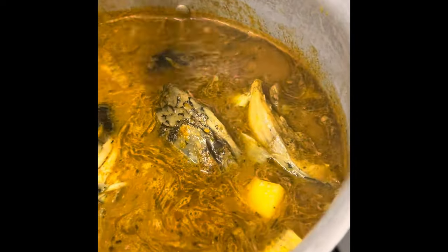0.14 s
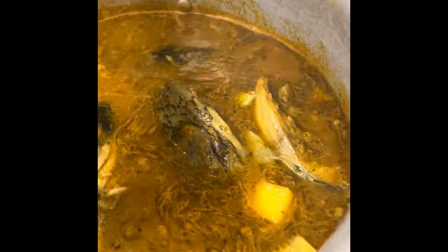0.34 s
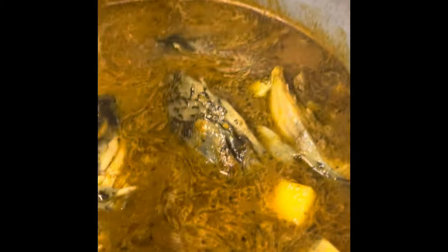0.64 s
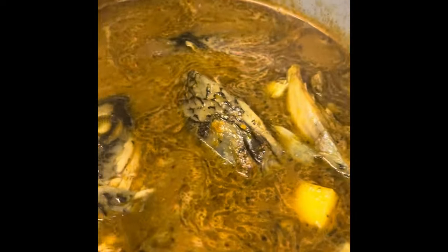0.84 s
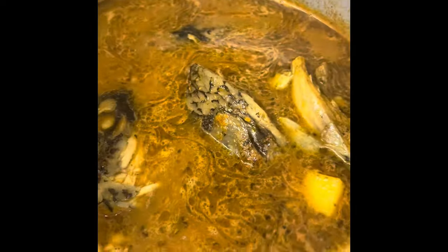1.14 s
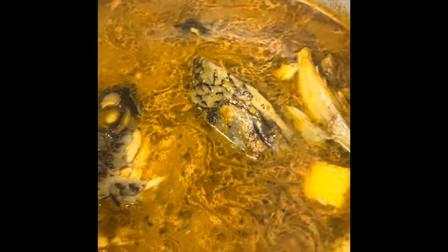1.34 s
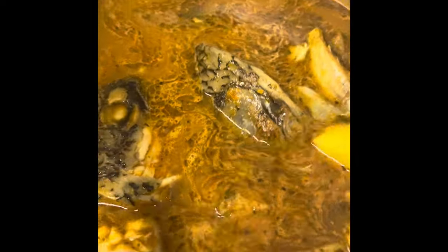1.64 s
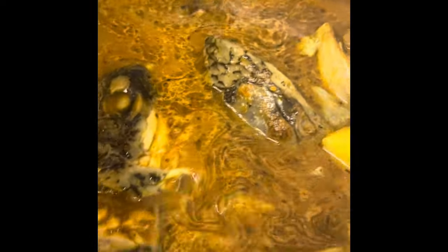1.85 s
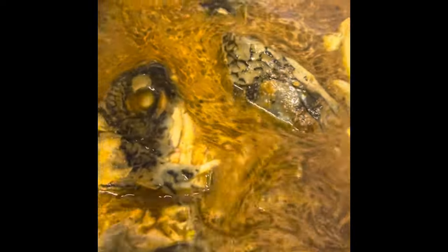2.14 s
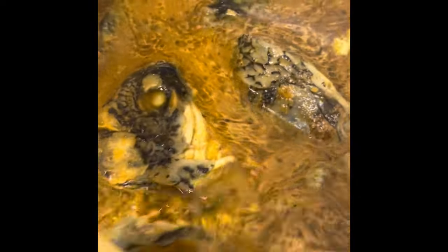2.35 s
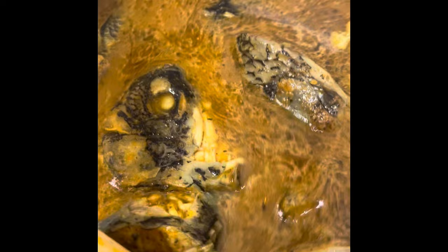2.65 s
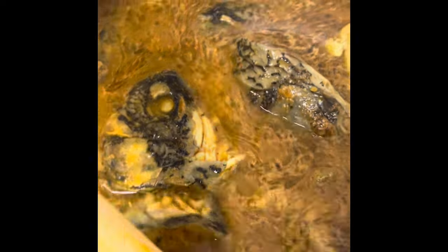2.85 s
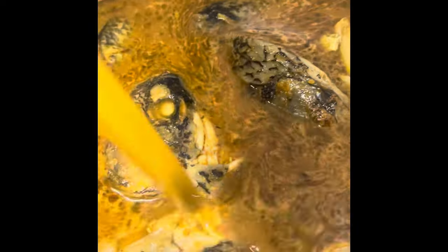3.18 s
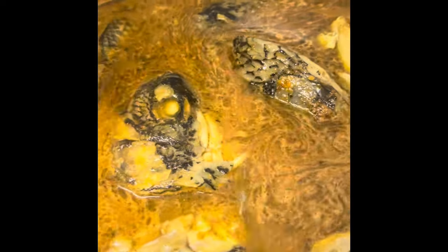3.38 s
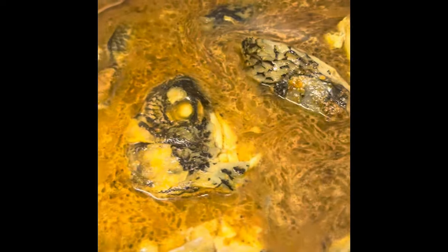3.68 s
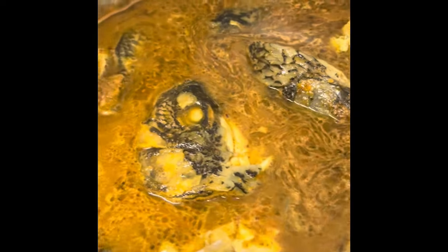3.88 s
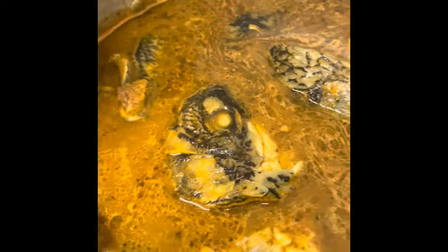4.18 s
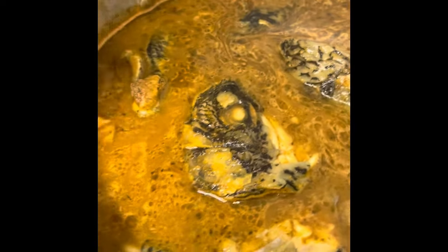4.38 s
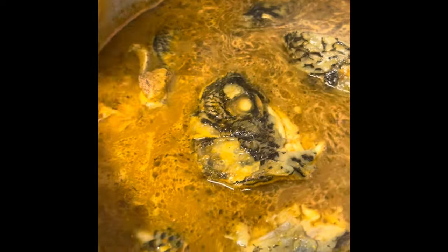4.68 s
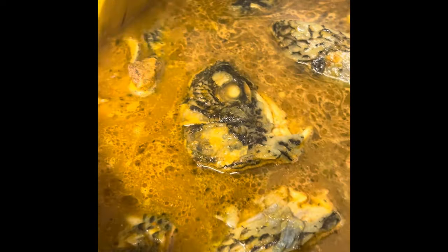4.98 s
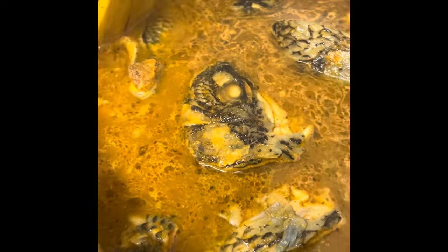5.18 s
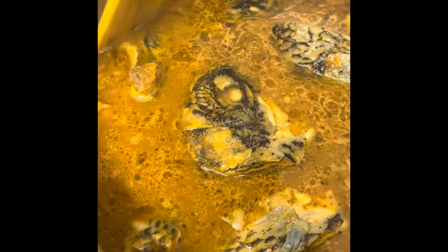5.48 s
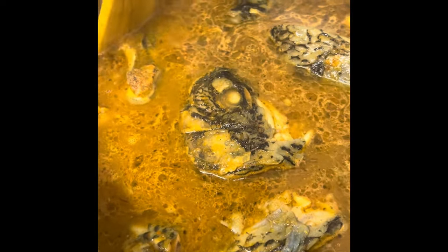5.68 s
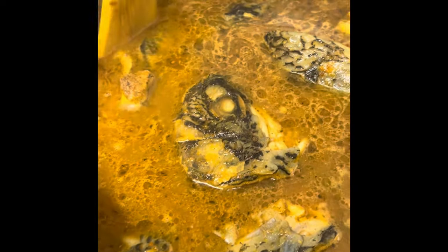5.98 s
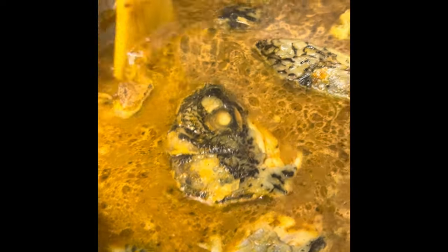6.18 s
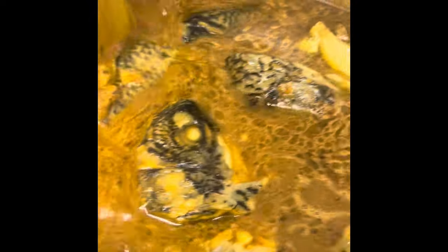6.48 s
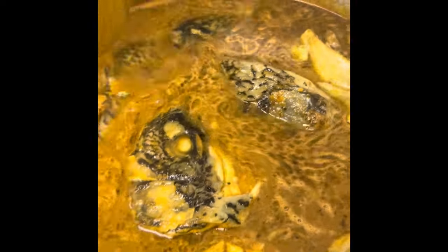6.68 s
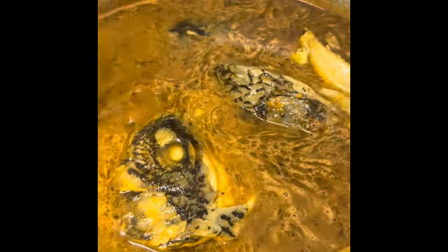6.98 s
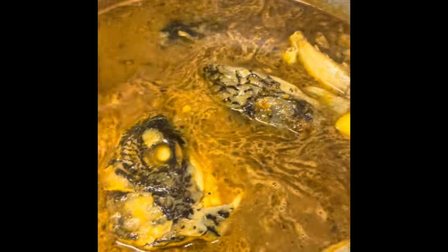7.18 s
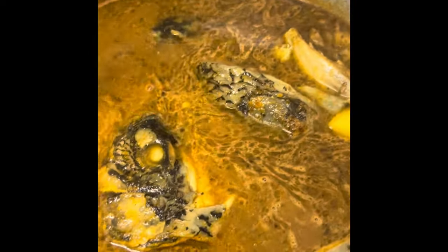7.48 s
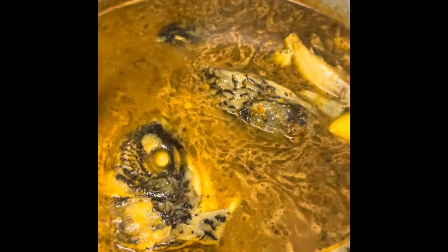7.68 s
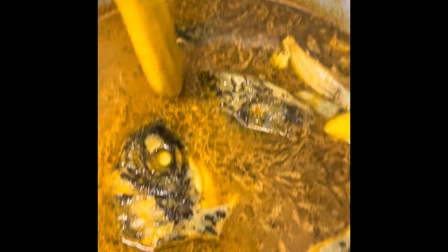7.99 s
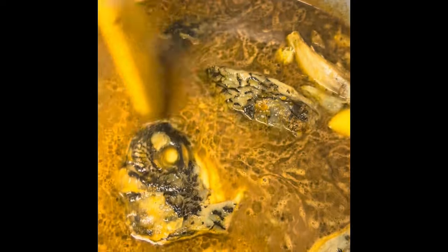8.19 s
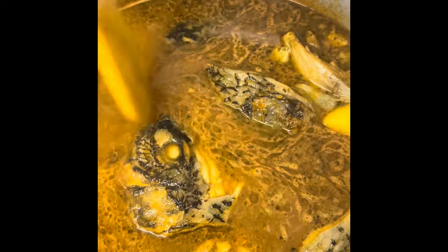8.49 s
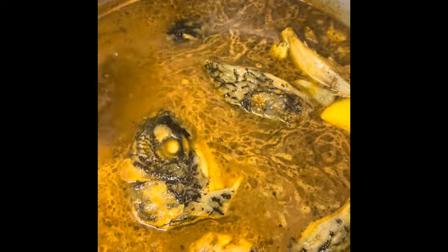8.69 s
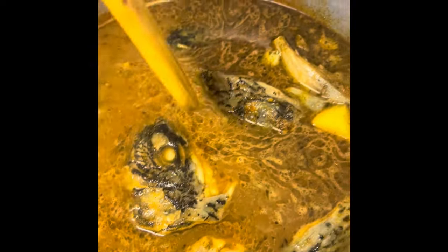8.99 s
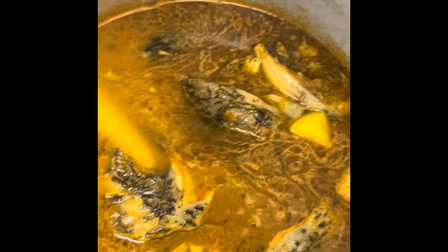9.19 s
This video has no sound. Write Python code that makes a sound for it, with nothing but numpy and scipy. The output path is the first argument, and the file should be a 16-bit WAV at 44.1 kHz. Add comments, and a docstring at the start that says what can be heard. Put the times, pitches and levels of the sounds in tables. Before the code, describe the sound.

A wooden spoon knocks and scrapes inside a big metal pot of thick, gently simmering soup, with dull bubble plops and a low stove rush.

```python
"""A wooden spoon stirs thick fish soup in a big aluminium pot, close by, in a small kitchen.
From the start the soup simmers with dull plops over the low rush of the stove; short bright bursts
of crackle with a rising ping make wet smacks, and ticks of the wet spoon as it knocks.
The spoon knocks on the wall, whose loaded bottom booms a moment later: ringing modes struck by a click.
Short strokes scrape the metal, noise and resonances shaped by pressure; past the middle comes a hard skid."""
import sys
import numpy as np
from scipy import signal
from scipy.fft import rfft, irfft, next_fast_len
from scipy.io import wavfile
from scipy.ndimage import uniform_filter1d, map_coordinates

SR = 44100
rng = np.random.default_rng(int(sys.argv[2]) if len(sys.argv) > 2 else 0)


def wav_out(sig):
    """Save sig, one row per channel (or a flat mono array), as 16-bit PCM at SR to the path in sys.argv[1]."""
    wavfile.write(sys.argv[1], SR, np.round(np.clip(np.atleast_2d(sig).T, -1, 1) * 32767).astype(np.int16))


N = 411894

# Colour of thick broth. Each row: frequency in Hz, relative level in dB per Hz.
BROTH = [(90, -13.5), (160, 6), (240, -2), (310, 6.5), (430, -2.5), (560, 0), (700, 1), (850, -1.5),
         (1000, -20.5), (1300, -15.5), (2200, -63.5)]
# Spoon strokes. Each row: moment of firmest pressure in s, rise in s, fall in s, then rasp, hiss, drag
# and wall ring in dB before the layers' own trims, and the centre of the ring in Hz.
STROKES = [(0.721, 0.0045, .004, -63, -74.5, -38, -86, 2300),
           (0.958, 0.17, 0.081, -63, -80, -58.5, -65, 3600),
           (1.37, 0.37, 0.044, -65, -86, -56.5, -74.5, 2430),
           (1.445, 0.072, 0.092, -56.5, -61, -51, -58, 2740),
           (1.76, 0.072, 0.053, -60.5, -61, -55, -67.5, 2580),
           (2.021, 0.15, 0.038, -60, -73.5, -53.5, -63.5, 2260),
           (2.17, 0.042, 0.062, -58.5, -59.5, -54, -68, 2500),
           (2.323, 0.018, 0.024, -60, -62, -48.5, -58.5, 2460),
           (2.383, 0.02, 0.07, -53, -56, -46, -55, 2370), (2.59, 0.052, 0.067, -52, -60.5, -53, -68, 6500),
           (2.806, 0.02, 0.037, -56, -58.5, -45.5, -64.5, 2600),
           (2.915, 0.011, 0.013, -62.5, -84, -72, -78, 2400),
           (2.991, 0.028, 0.031, -65.5, -61.5, -67.5, -82, 5060),
           (3.712, 0.012, 0.053, -72, -71.5, -54.5, -73.5, 4250),
           (3.81, 0.11, 0.1, -68, -79, -63.5, -72.5, 4200),
           (4.015, 0.032, 0.059, -67.5, -71, -76, -81, 4900),
           (4.17, 0.041, 0.059, -70, -77, -57, -70.5, 4200),
           (4.365, 0.096, 0.078, -65, -63.5, -63.5, -61.5, 4300),
           (4.603, 0.03, 0.03, -66, -73.5, -64, -71, 2760),
           (4.657, 0.019, 0.022, -63.5, -66, -69, -67, 5140),
           (4.682, 0.0063, 0.059, -58.5, -49, -67, -60, 3800),
           (4.802, 0.068, 0.072, -57.5, -58.5, -51.5, -73, 2500),
           (4.99, 0.064, 0.075, -65, -73, -63, -74.5, 4560),
           (5.55, 0.08, 0.11, -61.5, -72, -58.5, -83.5, 2680),
           (5.95, 0.068, 0.086, -70.5, -82.5, -64.5, -89, 2660),
           (6.11, 0.022, 0.094, -68, -73.5, -80, -90, 2470),
           (6.29, 0.084, 0.1, -76, -95.5, -64.5, -96, 2240),
           (8.058, 0.14, 0.13, -74.5, -101, -73, -84, 2304)]
# Wall resonances fed by rubbing. Each row: frequency in Hz, width in Hz, relative level in dB.
SINGING = [(1510, 80, -8.5), (2400, 220, -3), (3102, 250, -8), (3470, 240, -7.5), (4000, 160, -14.5),
           (4600, 210, -13.5), (5070, 73, -14.5), (5770, 300, -2), (6500, 140, -7.5), (6870, 170, -8),
           (7860, 120, -11), (8370, 160, -10.5), (9060, 190, -7)]


def amp(db):
    """Decibels to gain."""
    return np.exp(np.asarray(db) * (np.log(10) / 20))


def unit(x):
    """Scale to rms 1."""
    return x / np.sqrt(np.mean(x ** 2) + 1e-20)


def along(points, hz):
    """Read a curve of (Hz, value) points on a log frequency axis."""
    f, v = np.transpose(points)
    return np.interp(np.log(hz + 1), np.log(f + 1), v)


def wobble(rate):
    """A smooth random curve, rate knots a second."""
    count = int(N * rate / SR) + 4
    fine = signal.resample(rng.standard_normal(count), count * 20)
    return np.interp(np.arange(N) * rate / SR * 20, np.arange(len(fine)), fine)


def wander(shape, smooth_s=0.0031):
    """A smooth random walk of phase in cycles, spreading by about 1 in a second."""
    size = max(int(smooth_s * SR), 1)
    steps = uniform_filter1d(uniform_filter1d(rng.standard_normal(shape), size), size)
    return np.cumsum(steps, axis=-1) / np.sqrt(SR)


def filtered(x, response):
    """Multiply the spectrum of x by a response of frequency."""
    n = x.shape[-1]
    padded = next_fast_len(n + SR // 5)
    return irfft(rfft(x, padded) * response(np.fft.rfftfreq(padded, 1 / SR)), padded)[..., :n]


def spread(pair, spectrum):
    """Colour two unrelated signals and blend them into left and right, rms 1."""
    # Each row: frequency in Hz, left-right likeness from 0 to 1.
    likeness = [(60, 1), (150, 0.87), (350, 0.98), (700, 0.64), (1400, 0.87), (3100, 0.99), (7000, 0.52),
                (15000, 0.13)]

    def mid_and_side(hz):
        turn = np.arccos(np.clip(along(likeness, hz), -1, 1)) / 2
        return amp(along(spectrum, hz)) * [np.cos(turn), np.sin(turn)]

    mid, side = filtered(pair, mid_and_side)
    return unit(np.array([mid + side, mid - side]))


def pulse(spectrum, size=2048):
    """The sharpest causal click with this spectrum (minimum phase), energy 1."""
    gain = amp(along(spectrum, np.fft.rfftfreq(size, 1 / SR)))
    cepstrum = irfft(np.log(gain + 1e-6))
    click = irfft(np.exp(rfft(2 * cepstrum * (np.arange(size) < size // 2))))
    return click / np.linalg.norm(click)


def grains(rate, scatter_db, smooth):
    """Random tiny impacts, rate a second, on a bed of noise, as two unrelated rows."""
    struck = rng.random((2, N)) < rate / SR
    hits = struck * rng.standard_normal((2, N)) * amp(scatter_db * rng.uniform(-1, 1, (2, N)))
    return unit(hits) + smooth * rng.standard_normal((2, N))


def shifting(x, depth_db, width_hz, life):
    """Resonances that come and go: random gain patches width_hz wide and life seconds long, rms 1."""
    hz, t, z = signal.stft(x, SR, nperseg=512)
    u, v = np.meshgrid(hz / width_hz, t / life, indexing="ij")
    knots = rng.standard_normal((int(u.max()) + 3, int(v.max()) + 3))
    patches = amp(depth_db * map_coordinates(knots, [u, v], order=2))
    return unit(signal.istft(z * patches, nperseg=512)[1][:, :x.shape[-1]])


def even(x, width_hz):
    """Flatten the broad humps of a rattle's spectrum, keeping its energy and phases."""
    z = rfft(x)
    power = np.mean(abs(z) ** 2, axis=0)
    width = max(int(width_hz * x.shape[-1] / SR), 1)
    hump = np.sqrt(abs(uniform_filter1d(power, width)) + 1e-20)
    return unit(irfft(z / hump, x.shape[-1])) * np.sqrt(np.mean(x ** 2))


def resonance(f, hz, width_hz):
    """Gain of one resonance at the frequencies f."""
    return 1 / (1 + ((f - hz) / (width_hz / 2)) ** 2)


def rubbed(hz, width_hz, size=N, catch_db=2.5, catches_per_s=28):
    """One resonance kept going by friction that catches and lets go, rms 1."""
    catch = amp(catch_db * wobble(catches_per_s)[:size])
    return unit(catch * filtered(rng.standard_normal(size), lambda f: resonance(f, hz, width_hz)))


def add(track, s, sound):
    """Mix a sound in at s seconds."""
    part = track[..., round(s * SR):][..., :sound.shape[-1]]
    part += sound[..., :part.shape[-1]]


def kitchen(x, wet_db):
    """A sound with its own stereo tail from the pot's hollow and the walls."""
    # Each row: frequency in Hz, t60 in seconds.
    tail_decay = [(150, 0.92), (500, 0.24), (1500, 0.29), (4000, 0.28), (10000, 0.21)]
    hz, t, z = signal.stft(rng.standard_normal((2, SR // 2)), SR, nperseg=256)
    fade = amp(-60 * t / along(tail_decay, hz)[:, None])
    tail = signal.istft(z * fade, SR, nperseg=256)[1]
    tail = spread(tail, [(100, 0), (10000, 0)]) / np.sqrt(tail.shape[1])
    return x + amp(wet_db) * signal.fftconvolve(np.atleast_2d(x), tail, axes=1)[:, :x.shape[-1]]


def simmer(broth_db=-1.7, bubble_db=-3, fizz_db=2.0, stove_db=-65):
    """Small bubbles on the broth's murmur, the fizz of oil, the stove's low rush and a faint hum."""
    # Each row: time in s, bubbling in dB, fizz in dB, both before the trims above.
    simmer_levels = [(0.0, -63, -76.5), (0.521, -61, -75), (0.78, -66.5, -74), (1.56, -62.5, -78),
                     (2.39, -61, -78.5), (3.22, -70, -79), (3.61, -64, -80.5), (6.3, -65, -79),
                     (6.66, -66.5, -80.5), (8.011, -62, -79), (8.71, -65, -79.5), (9.34, -64, -79.5)]
    # Colour of the spitting oil. Each row: frequency in Hz, relative level in dB per Hz.
    oil_colour = [(600, -28), (1000, 2.5), (1350, -11), (1600, -3.5), (1880, -4.5), (2120, -9.5),
                  (2370, -8.5), (2700, -10), (3050, -10.5), (3500, -13), (4100, -17), (5200, -18),
                  (8000, -18), (11300, -23.5), (14000, -43), (16000, -51.5)]
    # Colour of the stove's rush. Each row: frequency in Hz, relative level in dB per Hz.
    stove_colour = [(20, -10), (36, -8.5), (55, 0), (90, 2.5), (200, -3), (350, -21.5), (500, -9),
                    (800, -45)]
    # Mains hum in the kitchen. Each row: frequency in Hz, level in dB.
    hum_tones = [(50, -70), (100, -70)]
    t = np.arange(N) / SR
    s, *levels = np.transpose(simmer_levels)
    bubbling, fizz = (amp(np.interp(t, s, db)) for db in levels)

    broth = amp(broth_db + 3.3 * wobble(25)) * spread(rng.standard_normal((2, N)), BROTH)

    spits = grains(rate=700, scatter_db=12.5, smooth=2.565)
    spits = shifting(spits, depth_db=2.2, width_hz=300, life=.07)
    oil = amp(fizz_db + 0.72 * wobble(8.4)) * fizz * spread(spits, oil_colour)

    drift = 0.36 * wobble(7.1)  # radians
    hum = sum(amp(db) * np.sqrt(2) * np.sin(2 * np.pi * hz * t + drift) for hz, db in hum_tones)

    stove = unit(filtered(rng.standard_normal(N), lambda hz: amp(along(stove_colour, hz))))
    return bubbling * (broth + amp(bubble_db) * bubbles()) + oil + hum + amp(stove_db) * stove


def bubbles(pitch_hz=660, octaves=0.31, cycles=2.67, scatter_db=1.2, muffle_hz=950, count=650):
    """Small bubbles at random moments, each a few fading cycles muffled by the thick soup, rms 1."""
    t = np.arange(SR // 50) / SR
    when = rng.integers(0, N, (count, 1))
    pitch, size = rng.standard_normal((count, 2)).T[:, :, None]
    turns = pitch_hz * 2 ** (octaves * pitch) * t
    fade = amp(scatter_db * size - 20 * turns / cycles)  # 20 dB down after so many cycles
    blips = fade * np.sin(2 * np.pi * turns) * (1 - np.exp(-2 * turns))
    train = np.bincount((when + np.arange(len(t))).ravel(), blips.ravel(), N)[:N]
    muffle = signal.butter(6, muffle_hz, fs=SR, output="sos")
    return unit(signal.sosfilt(muffle, train))


def plops(plop_db=1, cycles=4, glide=0.034, pop=0.31, skin=0.2):
    """Bubbles burst in thick soup: a dull pop, a few rising cycles and a splutter."""
    # Each row: start in s, level in dB before the trim plop_db, starting pitch in Hz.
    big_bubbles = [(0.162, -54, 610), (0.338, -42, 655), (0.856, -44, 503), (1.086, -37, 450),
                   (1.376, -40, 414), (1.627, -42.5, 560), (1.838, -45, 483), (2.791, -42, 594),
                   (3.363, -48.5, 720), (3.623, -41, 650), (3.796, -43, 770), (3.894, -45.5, 605),
                   (3.947, -47, 606), (4.072, -45.5, 670), (4.237, -43, 640), (4.605, -43, 604),
                   (5.053, -45, 660), (5.087, -46, 720), (5.134, -46, 626), (5.31, -44, 657),
                   (5.381, -40, 683), (5.531, -41.5, 643), (5.597, -43, 655), (5.842, -43.5, 610),
                   (5.935, -44, 610), (6.296, -45.5, 542), (6.374, -48.5, 562), (6.431, -48, 444),
                   (6.691, -44.5, 548), (6.998, -48.5, 675), (7.333, -47, 660), (7.57, -45.5, 617),
                   (7.627, -44, 655), (7.776, -51, 677), (8.032, -48, 660), (8.054, -41.5, 644),
                   (8.139, -38.5, 665), (8.78, -54, 654), (8.986, -50.5, 540), (9.057, -46, 647)]
    out, t = np.zeros(N), np.arange(SR // 10) / SR
    dull = pulse(BROTH)
    for s, db, hz in big_bubbles:
        age = t * hz / cycles  # the tone is 20 dB down at age 1
        rising_hz = hz * (1 + glide * np.minimum(2 * age, 1))
        tone = np.sin(2 * np.pi * np.cumsum(rising_hz) / SR) * amp(-20 * age)
        splutter = skin * rng.standard_normal(len(t)) * amp(-60 * t / 0.049)
        tear = splutter + pop * (t == 0) / dull.max()
        burst = signal.fftconvolve(tear, dull)[:len(t)]
        add(out, s, amp(db + plop_db) * (tone * (1 - np.exp(-t / 0.00088)) + burst))
    return out


def smacks_and_ticks(octaves=0.8, ping=0.23, glide=.07):
    """Short bright crackling bursts, each with a rising ping: wet smacks, and ticks of the wet spoon as it knocks."""
    # Each row: start in s, level in dB, centre in Hz, length in s.
    wet_bursts = [(0.294, -63.5, 1970, .023), (0.474, -65.5, 9900, 0.0034), (0.546, -54.5, 10000, 0.0036),
                  (0.576, -70, 8930, 0.00354), (2.209, -56.5, 1840, 0.0082), (2.651, -63, 5930, .004),
                  (2.952, -60, 7460, 0.03), (3.035, -71, 3470, .008), (3.071, -64.5, 9240, 0.0023),
                  (3.699, -59, 3470, 0.0037), (4.138, -64, 5400, 0.0018), (5.544, -69.5, 6350, 0.0063),
                  (5.595, -70.5, 6300, 0.0084), (6.629, -75.5, 2110, 0.024), (6.995, -63, 6340, 0.0026),
                  (6.996, -68, 1880, .003), (7.021, -73, 2300, 0.025), (7.28, -74.5, 2600, 0.0074),
                  (7.39, -79.5, 3200, .02), (7.932, -76.5, 2600, 0.023), (8.362, -71.5, 1900, .022),
                  (8.661, -74, 2200, 0.013), (7.114, -65, 1615, 0.025), (7.13, -68.5, 2550, 0.0122),
                  (7.122, -68.5, 6300, 0.018), (7.132, -72, 9200, .01), (7.142, -66, 2000, .003),
                  (7.648, -71.5, 3420, 0.0094), (8.174, -66.5, 2190, 0.04), (8.178, -68.5, 5100, 0.025),
                  (8.194, -58, 5950, 0.0033), (8.346, -60, 2050, 0.0025), (8.347, -68, 3400, .0018),
                  (8.591, -70.5, 1900, 0.0083), (8.696, -62, 3870, 0.0018), (8.713, -62.5, 3350, 0.0024)]
    out, t = np.zeros(N), np.arange(SR // 5) / SR
    for s, db, centre_hz, length in wet_bursts:
        band = lambda hz: (1 + (np.log2((hz + 1) / centre_hz) / octaves) ** 2) ** -2
        crackle = rng.laplace(size=(1, len(t)))
        crackle = shifting(crackle, depth_db=3, width_hz=220, life=.1)[0]
        burst = unit(filtered(crackle, band))
        rising_hz = centre_hz * (1 + glide * np.minimum(t / length - .5, 2))
        rising_ping = np.sin(2 * np.pi * np.cumsum(rising_hz) / SR)
        swell = (2 * t / length) * np.exp(1 - 2 * t / length)  # peaks at half the length
        add(out, s, amp(db) * (burst + ping * rising_ping) * swell)
    return out


def knocks(click_db=5, clatter_db=-8.5, tick_db=-23, graze_db=-32, graze_rise=0.0029, wash_t60=0.27,
           wall_waver=1.1):
    """Each blow: a brief graze, a crack, the spoon's short tone, the wall's clatter, modes and wash, and the boom."""
    # Spoon blows. Each row: start in s, knock in dB, contact cut-off in Hz, clatter t60 in s,
    # wall ring in dB re knock, wash in dB re knock, spoon tone in Hz, spoon tone in dB re knock,
    # spoon tone t60 in s, boom in dB, boom centre in Hz, boom delay in s.
    blows = [(0.547, -9.5, 3480, 0.02, -20, -37, 1310, -9, 0.018, -23.5, 110, 0.026),
             (0.7226, -18.5, 2660, 0.033, -19.5, -28, 1162, -7.5, 0.048, -30.5, 124, 0.025),
             (2.3055, -33, 710, .025, -15.5, -38, 297, 1, 0.05, -36.5, 215, 0.00703),
             (2.376, -42.5, 4000, .025, -24, -14, 603, 2.5, 0.035, -64, 180, 0.0108),
             (3.4854, -11, 12500, 0.02, -25, -25, 830, -13.5, 0.027, -28.5, 237, 0.021),
             (3.699, -62, 6100, 0.023, -10, -26, 810, 8, .03, -44, 143, .026),
             (4.137, -45.5, 970, 0.021, -11, -27, 710, 1.5, 0.032, -57, 168, 0.026),
             (4.854, -50.5, 605, .025, -4, -20, 390, -10, .08, -47, 161, 0.023)]
    # Pot wall modes. Each row: frequency in Hz, mean relative level in dB, t60 in s.
    wall_modes = [(323.8, -2, 0.18), (386, 6, 0.17), (523, -4, 0.14), (586, -9.5, .13), (800, -0.5, .14),
                  (948, 0.5, 0.083), (1023, -10, 0.083), (1190, -10.5, 0.13), (1310, -11, 0.079),
                  (1480, -13, 0.11), (2120, -19, 0.14), (2240, -10.5, 0.13), (2720, -14.5, 0.077),
                  (3220, -24.5, .15), (3572, -23, 0.12), (3747, -22, 0.2), (4172, -28, .19)]
    # Colour of wood on metal. Each row: frequency in Hz, relative level in dB per Hz.
    crack_colour = [(100, -15), (250, -5), (450, -9.5), (700, 0), (1000, -2), (1400, -4), (1800, -12.5),
                    (2280, -6), (2650, -17), (3200, -12.5), (3750, -13), (5000, -18.5), (7800, -17.5),
                    (11500, -37.5), (15000, -51.5)]
    # The wall's many weak, overlapping modes. Each row: frequency in Hz, relative level in dB per Hz.
    wash_colour = [(250, -9), (450, -0.5), (700, 7), (1100, -0.5), (1400, -1), (1800, -18), (2250, -13.5),
                   (2700, -23.5), (3700, -9.5), (4800, -20.5), (9000, -33.5)]
    out, lead = np.zeros((2, N)), SR // 50  # lead: samples kept for the graze before contact
    t = np.arange(-lead, SR // 2) / SR
    age, click = np.maximum(t, 0), pulse(crack_colour)
    onset = 1 - np.exp(-age / 0.00025)
    hz, level, t60 = np.transpose(wall_modes)[:, :, None]
    signs = (-1) ** np.arange(len(wall_modes))[:, None]
    for (s, db, contact_hz, clatter_t60, ring_db, wash_db, wood_hz, wood_db, wood_t60,
         boom_db, centre_hz, delay) in blows:
        clatter = spread(rng.standard_normal((2, len(t))), [(100, 0), (10000, 0)])
        graze = amp(graze_db) * np.exp(-abs(t) / graze_rise)
        shape = np.where(t < 0, graze, amp(clatter_db - 60 * age / clatter_t60))
        contact = even(shape * clatter + amp(click_db) * (t == 0), width_hz=520)
        crack = signal.fftconvolve(contact, click[None], axes=1)[:, :len(t)]

        # moving soup loads the wall, so each mode's phase wanders
        drift = wander((len(wall_modes), len(t) - lead))
        drift = wall_waver * np.pad(drift, [(0, 0), (lead, 0)])
        strength = level + rng.normal(0, 1.2, level.shape)
        modes = amp(strength - 60 * age / t60) * np.sin(2 * np.pi * (hz * age + drift))
        ring = amp(ring_db) * np.sum(modes * signs, axis=0)

        weak_modes = shifting(rng.standard_normal((2, len(t))), depth_db=4, width_hz=130, life=.06)
        wash = amp(wash_db - 60 * age / wash_t60) * spread(weak_modes, wash_colour)
        wood = amp(wood_db - 60 * age / wood_t60) * np.sin(2 * np.pi * wood_hz * age)

        # a soft, wet contact keeps only a faint tick of its treble
        soft = signal.butter(6, min(contact_hz, SR / 2.2), fs=SR, output="sos")
        blow = signal.sosfilt(soft, crack + (ring + wash + wood) * onset) + amp(tick_db) * crack
        low = amp(boom_db) * onset * boom(t - delay, centre_hz)
        add(out, s - lead / SR, amp(db) * kitchen(blow, wet_db=-13.5) + low)
    return out


def boom(t, centre_hz, rise=0.005, hold=0.0083, octaves=0.52, waver=.8):
    """The bottom swells around t = 0 and holds briefly; the place of contact picks its modes, which waver as the soup sways."""
    # Modes of the bottom under the soup. Each row: frequency in Hz, relative level in dB, t60 in s.
    bottom_modes = [(74.6, -9.5, 0.63), (116.6, -10.5, 0.39), (125.9, -10, 1.0), (130.7, -3.5, 0.11),
                    (143, -17.5, 1.1), (152.5, -2.5, 0.38), (177.5, -9, 0.25), (207.4, -11, 0.4)]
    swell = np.exp(-(np.minimum(t + hold, 0) / rise) ** 2)
    total = 0
    for hz, db, t60 in bottom_modes:
        fade = amp(db - 60 * np.maximum(t - hold, 0) / t60)
        picked = np.exp(-(np.log2(hz / centre_hz) / octaves) ** 2 / 2)
        sway = waver * np.interp(t, t[t > 0], wander(np.sum(t > 0)))
        total = total + fade * picked * np.cos(2 * np.pi * (hz * t + sway))
    return swell * total


def scrapes(rasp_db=-3.0, hiss_db=-4.0, drag_db=-2.0, judder_db=1.56, squelch_db=-14, clump_db=3,
            between_modes=1.0):
    """Wet wood rubs on the metal: dense tiny slips ring the wall's upper modes and shake the pot."""
    # Four colours of rubbing. Each row: frequency in Hz, relative level in dB per Hz.
    rasp_colour = [(400, -24), (650, 14), (850, 7.5), (1080, 8.5), (1300, 2.5), (1520, 2), (1900, 0),
                   (2400, -3.5), (2800, -4), (3300, -9.5), (4400, -11.5), (6000, -36.5), (9000, -34)]
    hiss_colour = [(2600, -10), (4500, 1.5), (5800, 3), (8000, 2.5), (10000, -5), (11400, -3.5),
                   (12500, -31), (16000, -26)]
    drag_colour = [(30, -28), (55, 2), (90, 0.5), (182, -2.5), (215, -5), (259, -1.5), (386, -5.5),
                   (563, -5.5), (631, -4), (892, -29.5), (1030, -13.5), (1100, -14), (1430, -37.5),
                   (2420, -120)]
    squelch_colour = [(500, -22.5), (1000, 3), (1700, 2), (3500, -3), (6000, -21), (12000, -53)]
    # Low resonances shaken by the dragging spoon. Each row: frequency in Hz, width in Hz,
    # level in dB re drag.
    shaken_modes = [(150, 24, -7), (183.5, 70, -3), (391, 30, -10.5)]
    pressures = np.array([stroke(s, rise, fall) for s, rise, fall, *_ in STROKES])
    rasp, hiss, drag = amp(np.transpose(STROKES)[3:6]) @ pressures

    # the sliding contact keeps passing from one set of wall modes to another
    slips = grains(rate=3000, scatter_db=5, smooth=.8)
    slips = shifting(slips, depth_db=4.2, width_hz=130, life=.07)
    modal = lambda f: between_modes + sum(resonance(f, hz, width_hz) for hz, width_hz, _ in SINGING)
    slips = filtered(slips, modal)
    judder = amp(judder_db * wobble(60))
    bright = amp(rasp_db) * rasp * spread(slips, rasp_colour)
    bright += amp(hiss_db) * hiss * spread(slips, hiss_colour)

    shudder = sum(amp(db) * rubbed(hz, width_hz) for hz, width_hz, db in shaken_modes)
    rumble = amp(drag_db) * spread(rng.standard_normal((2, N)), drag_colour)
    low = drag * (rumble + shudder)

    # sauce caught under the spoon squelches in tiny clumped pops
    pops = grains(rate=600, scatter_db=4, smooth=.25)
    squelch = amp(squelch_db + clump_db * wobble(35)) * rasp * spread(pops, squelch_colour)
    return judder * bright + squelch + low + kitchen(singing(pressures), wet_db=-12.5)


def stroke(s, rise, fall, steepness=2.06):
    """The spoon's pressure: a rounded swell up to s seconds, then a release."""
    t = np.arange(N) / SR - s
    return np.exp(-np.minimum(np.maximum(-t / rise, t / fall), 5) ** steepness)


def singing(pressures, octaves=0.41):
    """Friction feeds the wall's resonances; the place of contact picks which of them sing."""
    ring_db, centre_hz = np.transpose(STROKES)[-2:]
    out = np.zeros(N)
    for hz, width_hz, db in SINGING:
        picked = amp(ring_db + db) * np.exp(-(np.log2(hz / centre_hz) / octaves) ** 2 / 2)
        out += picked @ pressures * rubbed(hz, width_hz)
    return out


def skid(start_s=4.672, length_s=0.17, attack_s=0.0042, release_s=0.026, bite_db=6, bite_s=0.019):
    """The spoon's edge bites and skids: the wall squeals in narrow modes, then the low ones take over."""
    # Each row: frequency in Hz, width in Hz, level in dB at the start and at the end, before the bite.
    skid_modes = [(177, 34, -66, -46.5), (384, 24, -73, -51), (780, 68, -76, -61), (1910, 110, -59.5, -73),
                  (2240, 100, -62, -66), (2550, 120, -69, -73), (3520, 1200, -64, -74),
                  (4200, 130, -64, -78), (4640, 140, -60, -78), (5220, 230, -56, -73),
                  (5750, 500, -62, -69), (6440, 200, -66, -73), (7390, 110, -67, -72),
                  (10650, 500, -72, -75)]
    out, t = np.zeros(N), np.arange(SR // 2) / SR
    way = np.minimum(t / length_s, 1)
    grip = (1 - np.exp(-t / attack_s)) * np.exp(-np.maximum(t - length_s, 0) / release_s)
    bite = amp(bite_db * np.exp(-t / bite_s))  # extra force as the edge first catches
    squeal = np.zeros(len(t))
    for hz, width_hz, first, last in skid_modes:
        squeal += amp(first + (last - first) * way) * rubbed(hz, width_hz, size=len(t))
    add(out, start_s, bite * grip * squeal)
    return out


def scene():
    """Spoon and soup reach the two microphone ports with different level and phase."""
    # Each row: frequency in Hz, left minus right in dB, left lead in radians.
    port_rows = [(150, -0.74, 0), (400, -3.5, -.7), (700, -1, 1), (1400, -1.8, -0.92), (3000, 2, 0.9),
                 (4270, -0.5, 0.24), (5300, .6, -1), (15000, -.5, -0.56)]
    pot = knocks() + scrapes() + kitchen(skid(), wet_db=-11.5)
    pot = pot + kitchen(plops(), wet_db=-7.5) + kitchen(smacks_and_ticks(), wet_db=-9) + simmer()
    ports, sides = np.array(port_rows), np.array([[.5], [-.5]])

    def port_response(hz):
        level = amp(sides * along(ports[:, :2], hz))
        return level * np.exp(1j * sides * along(ports[:, ::2], hz))

    return filtered(pot, port_response)


def record(dry, low_hz=39.05, top_hz=15800):
    """The microphone sheds the deepest bass and keeps nothing above its band limit."""
    thin = signal.sosfilt(signal.butter(2, low_hz, "highpass", fs=SR, output="sos"), dry)
    return filtered(thin, lambda hz: hz < top_hz)


dry = scene()
out = record(dry)
wav_out(out)
```